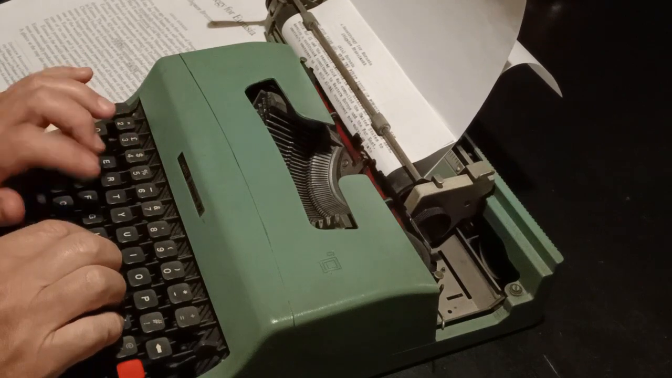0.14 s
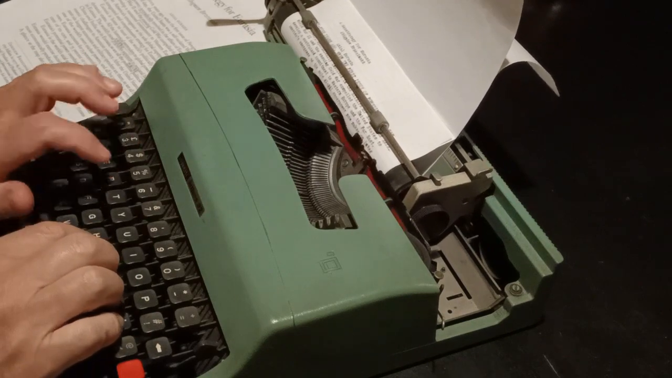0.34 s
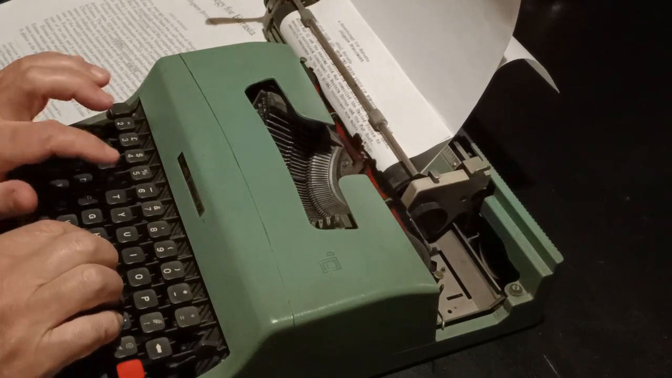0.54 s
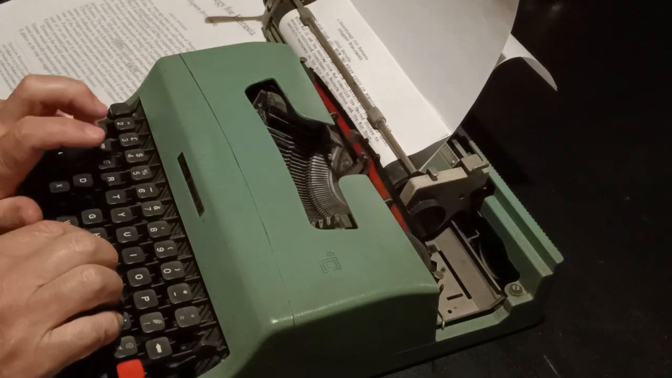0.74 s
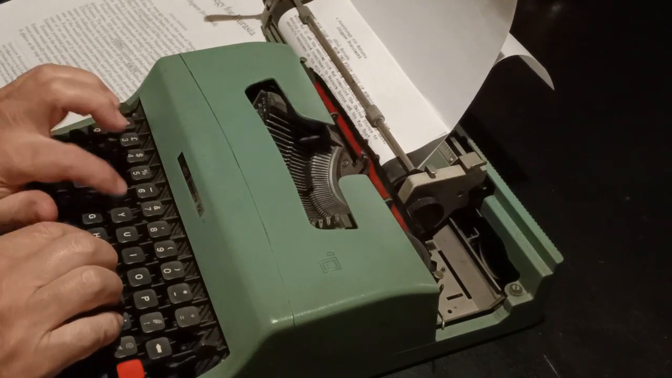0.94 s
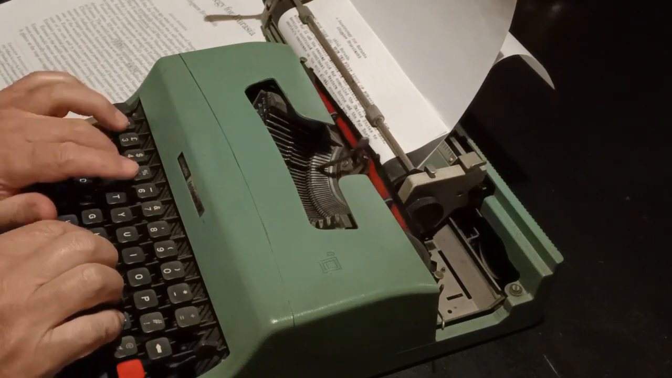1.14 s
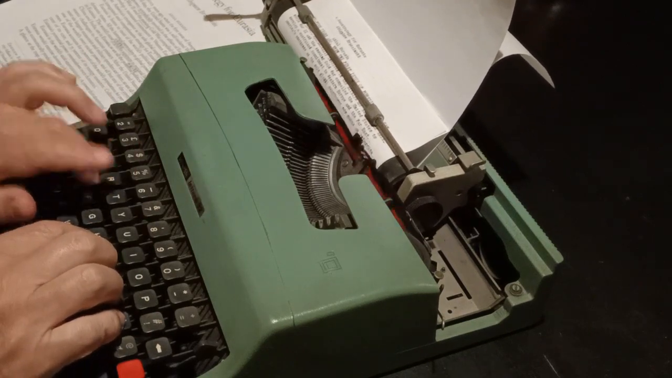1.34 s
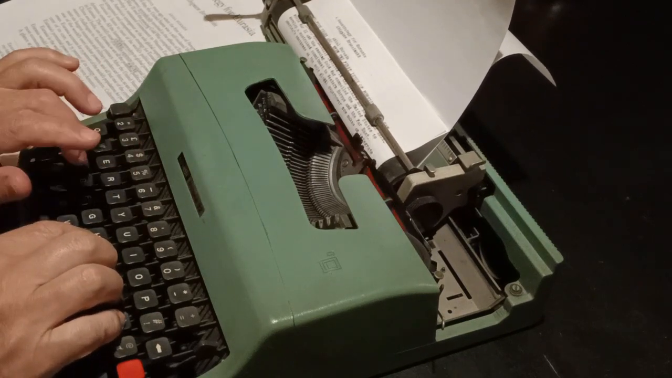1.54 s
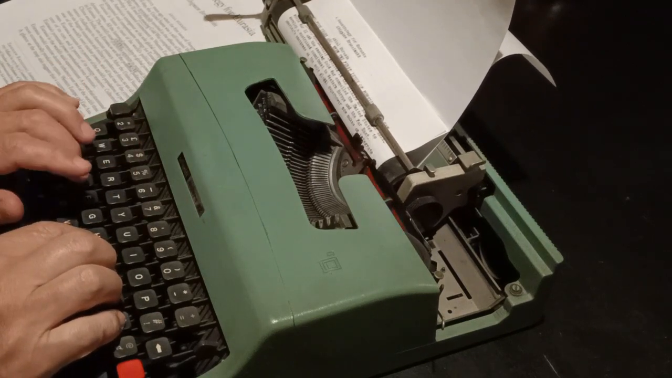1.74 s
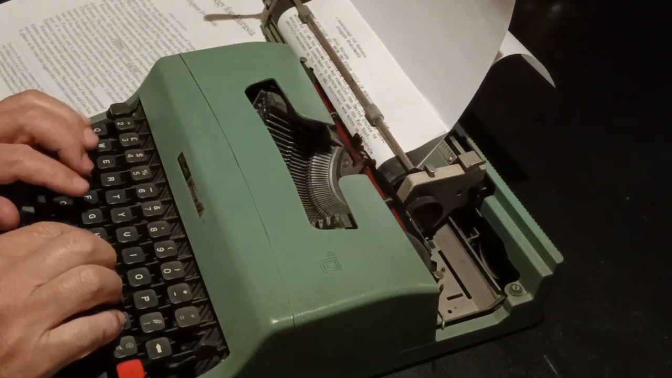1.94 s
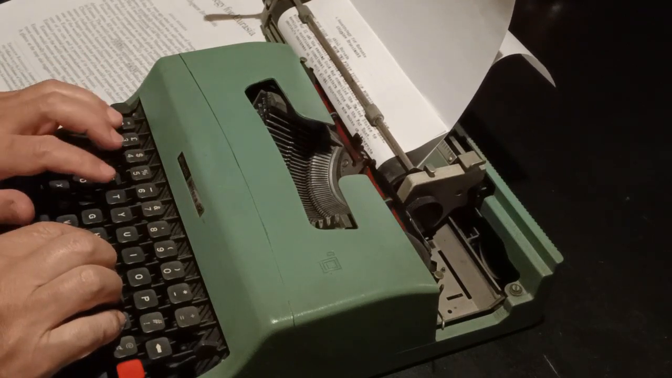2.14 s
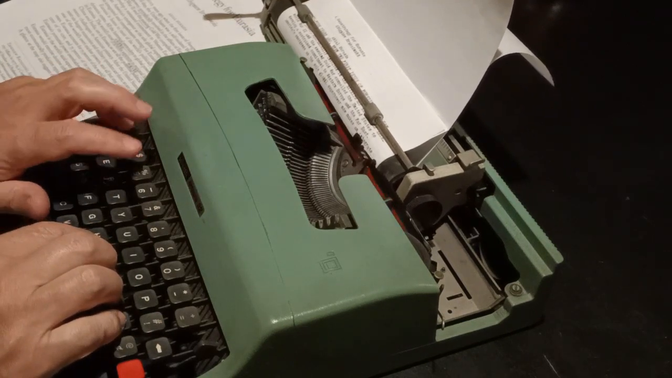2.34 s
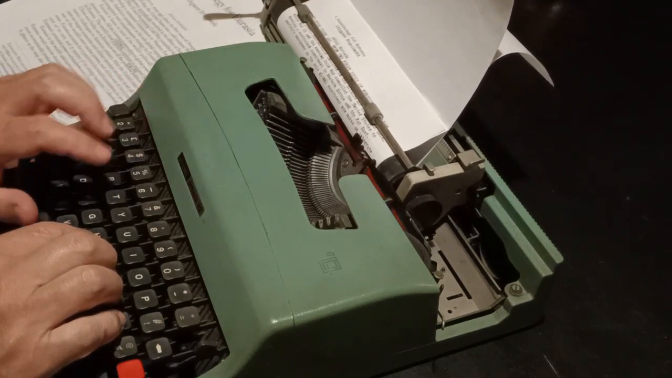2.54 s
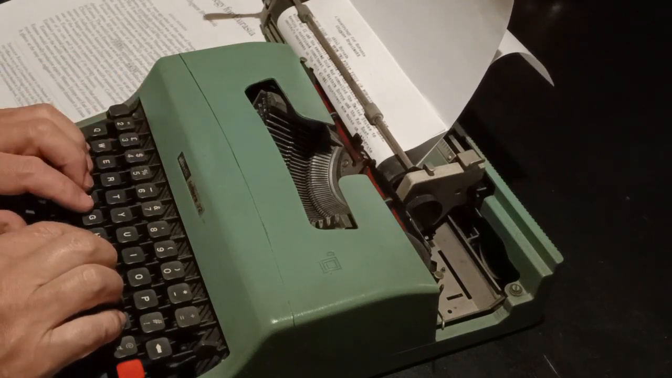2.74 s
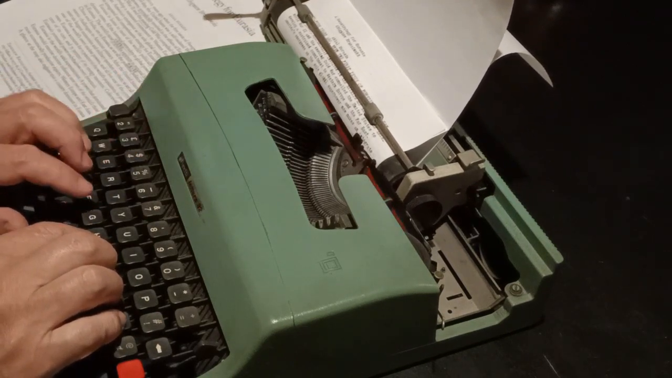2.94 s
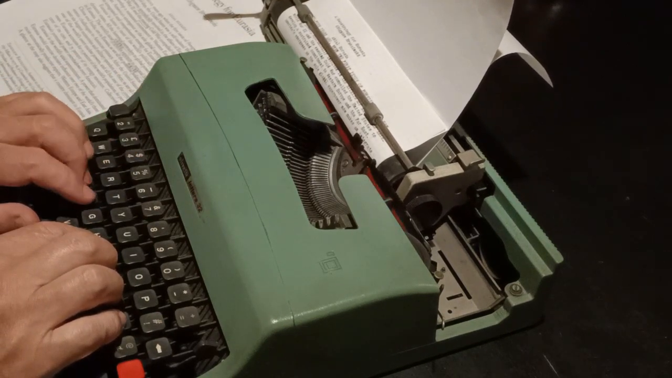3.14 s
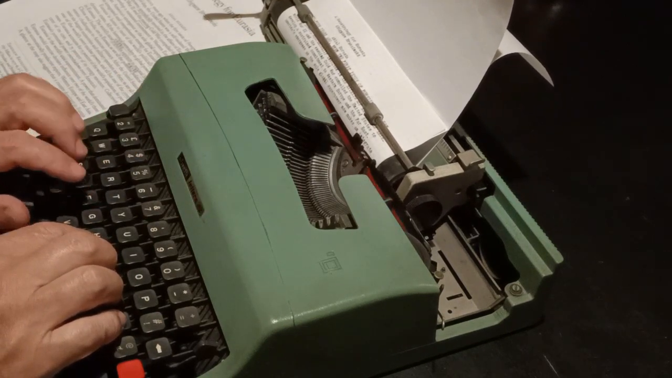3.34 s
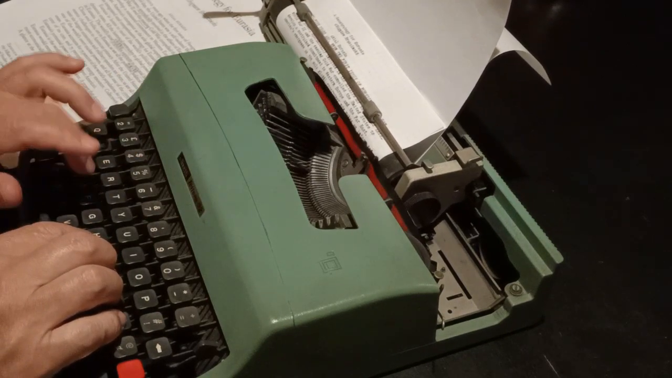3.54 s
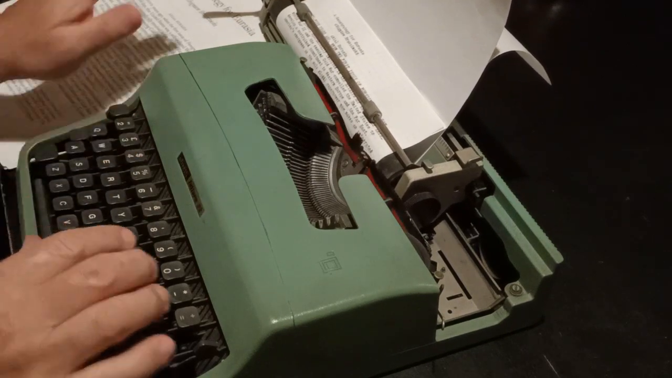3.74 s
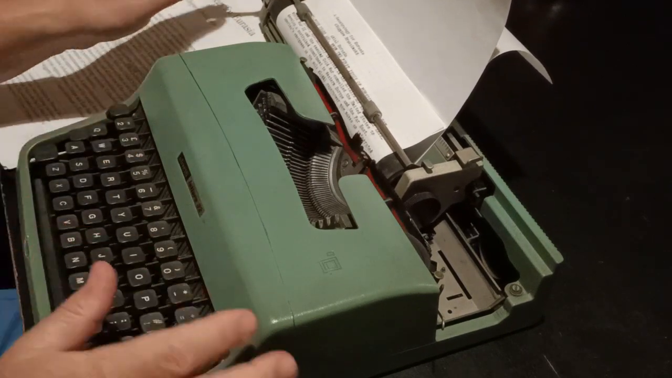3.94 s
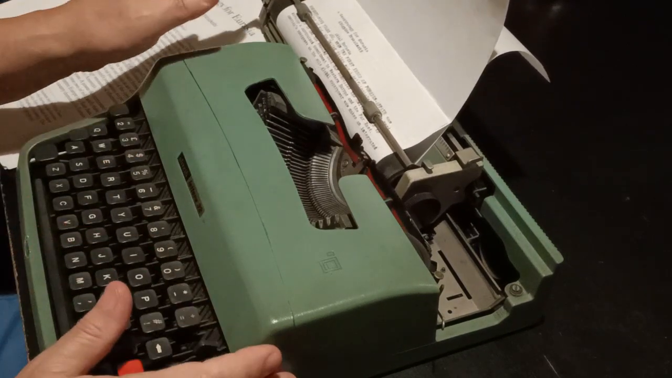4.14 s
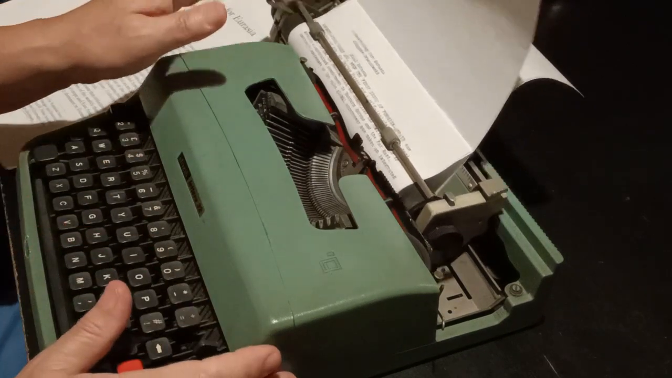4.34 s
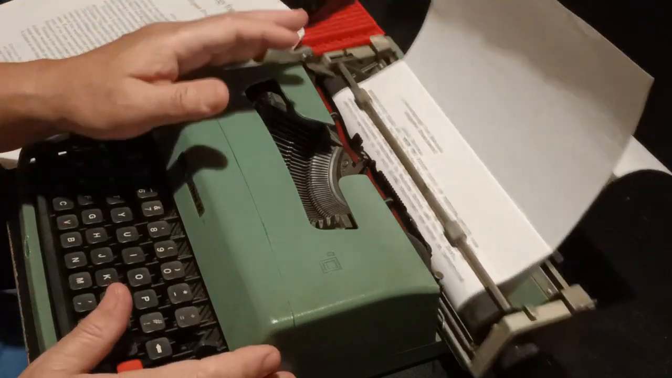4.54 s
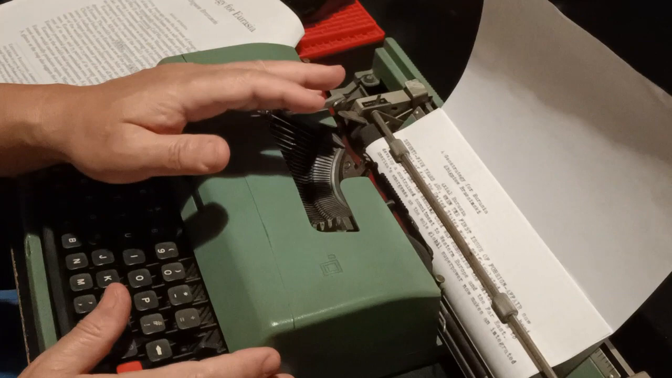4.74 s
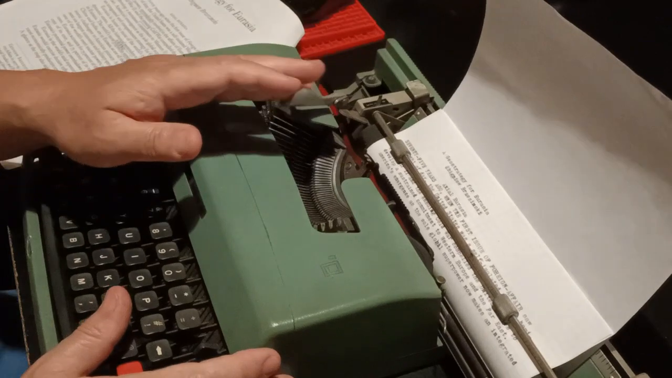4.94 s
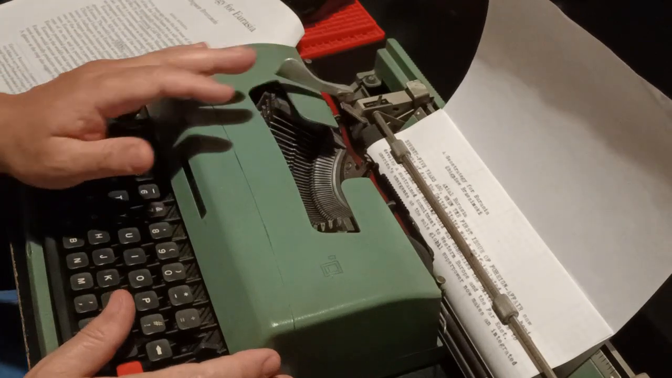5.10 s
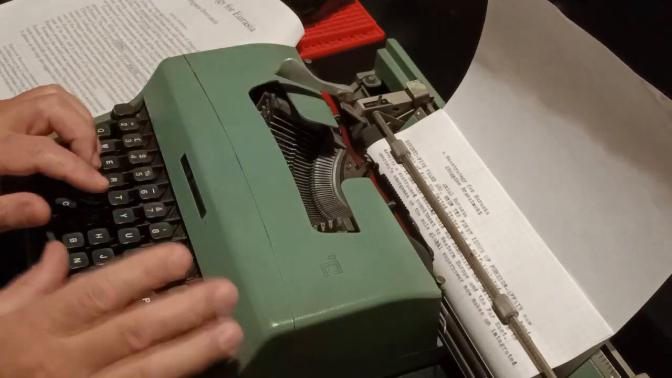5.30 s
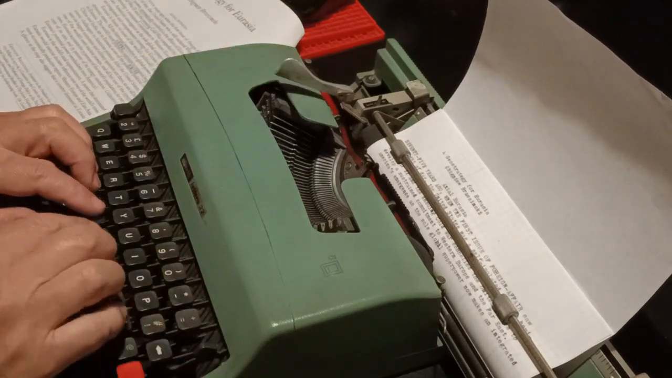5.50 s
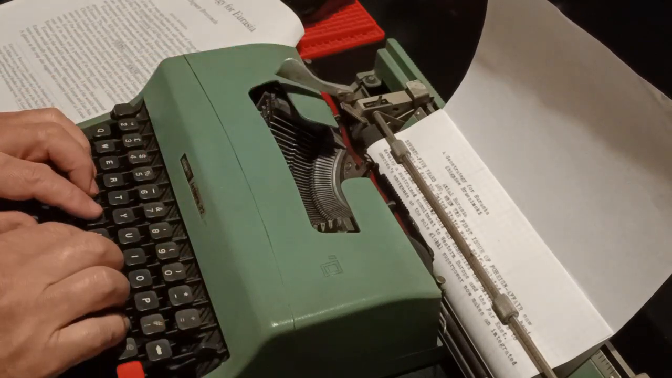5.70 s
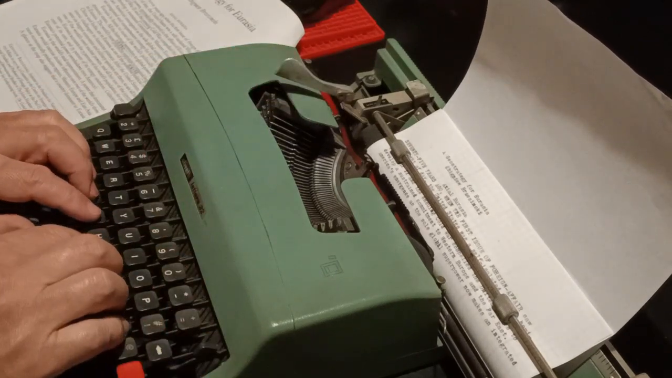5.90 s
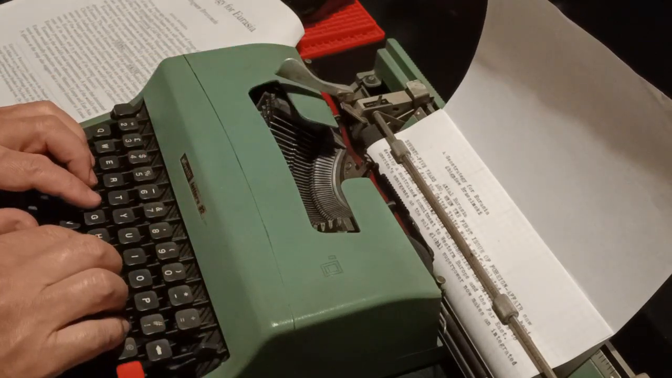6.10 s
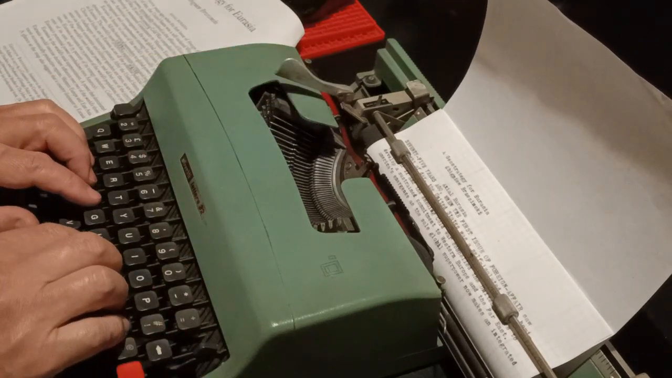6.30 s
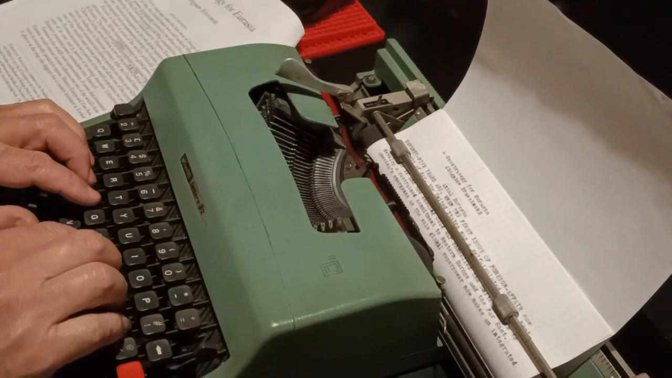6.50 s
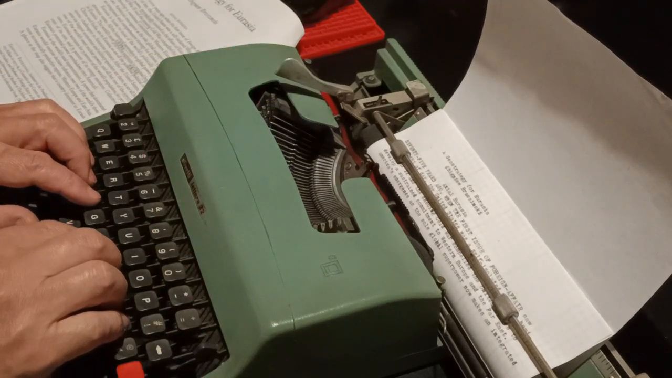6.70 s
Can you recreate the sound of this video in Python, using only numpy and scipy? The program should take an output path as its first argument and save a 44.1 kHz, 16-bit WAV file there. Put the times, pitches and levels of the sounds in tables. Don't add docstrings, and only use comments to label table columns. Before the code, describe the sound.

Close manual typewriter on a desk in a small room, stereo, arm's length. Six bright cracks come rapidly, each metal bar clacking back more softly. Tiny ticks lead into a pause, then a dull space-bar knock and one lone strike. Lever clicks precede a short grinding carriage run ending in a firm stop and settling clicks. Faint traffic remains, with a low engine drone near the end.

```python
import sys
import numpy as np
from scipy import signal
from scipy.fft import rfft, irfft, next_fast_len
from scipy.io import wavfile

SR = 44100
rng = np.random.default_rng(int(sys.argv[2]) if len(sys.argv) > 2 else 0)


def boost_factor(decibels):
    exponent = np.asarray(decibels, float) / 20
    return 10 ** exponent


def dump(signal):
    limited = np.clip(np.atleast_2d(signal).T, -1, 1)
    pcm = np.round(limited * 32767).astype(np.int16)
    wavfile.write(sys.argv[1], SR, pcm)


N = 302526

# key down [t/s], linkage [level/dB], typebar strikes [t/s], strike [level/dB], typebar ring [f/Hz]
LETTERS = [
    (.0, -23.5, 0.0082, -6, 3143),
    (.226, -30.5, 0.26, -5.5, 2990),
    (.43, -36, .4669, -8.5, 4170),
    (.68, -33.5, 0.72, -7.5, 4283),
    (.855, -32.5, .9014, -5.5, 3330),
    (1.144, -31.5, 1.1783, -6, 3610),
    (3.429, -31.5, 3.463, -6, 3593),
]
# [t/s], peak [level/dB], rattle just before [level/dB]
FALLS = [
    (0.122, -23.5, -50.5),
    (0.3689, -21.5, -50),
    (0.5676, -24, -29),
    (1.027, -24.5, -32),
    (1.3042, -22, -41),
    (3.5953, -24.5, -32),
]
# [t/s], peak [level/dB], ring [f/Hz]
TICKS = [(.856, -23.5, 6000), (1.3959, -29.5, 5500), (1.4561, -38, 5860), (1.4814, -38.5, 3350),
         (1.5055, -39, 6200), (1.5339, -41.5, 2620), (2.5248, -32.5, 3150), (2.6904, -43.5, 5830),
         (2.7016, -46, 5450), (3.0492, -60, 5770), (3.2161, -37.5, 5900), (4.2383, -37, 4300),
         (4.2654, -43, 1700), (4.371, -37, 2990), (4.4804, -26, 2560), (4.9935, -29, 2010),
         (5.0028, -23, 2160), (5.0195, -22.5, 2870), (5.9394, -58, 5790), (5.9588, -60, 2340)]
# [t/s], [level/dB], desk [level/dB], lasts [t/s]
SLIDES = [(1.393, -39.5, 2.5, .04), (1.44, -50, -7.5, .1), (2.337, -41, 4, .05), (2.534, -40.5, -2, .014),
          (3.148, -53.5, -2, .044), (4.104, -35.5, -16, .056), (4.135, -49.5, 4, .03),
          (4.296, -32, -8.5, 0.015), (4.766, -24.5, -11.5, 0.024), (4.801, -34, -7, .04),
          (4.948, -43.5, 1.5, 0.046)]
# [t/s], peak [level/dB], desk [level/dB], decay t60 [t/s]
KNOCKS = [
    (2.35, -27.5, -12, 0.14),
    (4.7707, -20, -19, 0.066),
    (4.9577, -30, -10, 0.065),
    (5.061, -25, -19, 0.046),
]
# [t/s], peak [level/dB], ring [f/Hz]
LEVER_CLICKS = [(3.9923, -48, 2990), (4.0053, -37, 3920), (4.0204, -42.5, 3910), (4.0524, -49, 2400),
                (4.0908, -45, 3460), (4.1036, -28.5, 5340), (4.116, -26, 2820), (4.151, -28.5, 3730),
                (4.5134, -33, 3660), (4.7052, -33, 1820), (5.0925, -34, 2600)]
# [t/s], roll [level/dB]
CARRIAGE_ROLL = [
    (4.2, -66),
    (4.279, -58.5),
    (4.303, -46),
    (4.34, -50),
    (4.379, -41.5),
    (4.441, -44),
    (4.495, -40.5),
    (4.74, -48.5),
    (4.77, -38.5),
]
# [t/s], rings for [t/s], [level/dB]
PLUCKS = [
    (.011, 0.26, 1.5),
    (3.15, 0.051, -25.5),
]
# [f/Hz], [level/dB], decay t60 [t/s]
BELL_PARTIALS = [(6423, -42, .68), (11188, -52, .6)]

# [f/Hz], density [level/dB]
PLATEN_COLOUR = [(180, -63), (300, -31.5), (703, -20), (1150, -17.5), (1650, -8.5), (2200, -11.5),
                 (3060, -1), (4880, -4), (5670, -0.5), (6880, -12.5), (8000, -13), (10400, -36.5),
                 (17600, -120)]
# [f/Hz], density [level/dB]
FRAME_COLOUR = [(150, -57), (250, -5), (398, -8), (466, -19.5), (614, -11.5), (1180, -11.5), (1310, -9.5),
                (1490, -12), (1700, -8), (3710, -3), (4820, -6), (5730, -5), (8000, -18), (10400, -46),
                (17600, -120)]
# [f/Hz], density [level/dB]
EDGE_COLOUR = [(4120, -38), (7000, -24), (8250, -2.5), (8960, -5), (10200, -5), (11800, -4.5), (14100, 1),
               (15500, -7), (16500, -32)]
# [f/Hz], width [f/Hz], [level/dB]
DESK_MODES = [(64, 26, -8), (87.5, 29, -3.5), (120.4, 17, 3), (195, 31, -6.5)]
# [f/Hz], width [f/Hz], [level/dB]
ROD_MODES = [(1680, 90, 3), (2560, 40, -4.5), (2990, 110, -8), (3580, 150, -14.5), (4000, 58, 7.5),
             (5500, 600, 10.5), (6100, 210, -3)]
# [f/Hz], width [f/Hz], [level/dB]
REST_MODES = [(1003.5, 27, 8), (804, 400, -15.5)]
# [f/Hz], width [f/Hz], [level/dB]
RAIL_MODES = [(1328, 23, -8), (1696, 39, -7), (2560, 61, 1), (3150, 60, -2.5), (3640, 56, -1.5),
              (4020, 33, 4.5), (4420, 48, -3), (5630, 67, 0), (6230, 46, -24)]
# [f/Hz], width [f/Hz], [level/dB]
CASE_MODES = [(260.2, 80, -3), (401, 40.7, 0), (650, 77, -2), (847, 60, -4)]

# [f/Hz], correlation [-1..1]
CONTACT_ALIKE = [(60, 0.97), (180, 0.99), (550, 0.75), (1650, 0.848), (4970, 0), (15000, 0.28)]
# [f/Hz], correlation [-1..1]
QUIET_ALIKE = [(60, 0.78), (240, 0.79), (950, 0.33), (3770, -0.43), (15000, 0.02)]
# [f/Hz], correlation [-1..1]
ROOM_ALIKE = [(150, 0.99), (500, .8), (2000, 0.37), (8000, 0.27)]
# [f/Hz], difference [level/dB]
LEAN = [(60, -2.5), (150, 0), (380, 0.0), (950, -0.5), (2380, 0), (5980, -1), (15000, -3)]
# [f/Hz], t60 [t/s]
ROOM_DECAY = [(100, 0.53), (500, 0.85), (2000, 0.42), (5000, 0.43), (13000, 0.36)]
# [f/Hz], density [level/dB]
AIR_COLOUR = [(13, -33.5), (22, -4), (49, 0), (101, -9.5), (171, -9), (281, -17), (332, -16.5),
              (610, -24.5), (663, -32), (762, -26.5), (1030, -27.5), (2650, -31), (5910, -39),
              (15200, -39.5), (16500, -49)]
# [t/s], [level/dB]
STREET = [(0, -77), (1.7, -79.5), (2.4, -76), (3.9, -75), (5.3, -74), (6.1, -70.5), (6.86, -71)]
# [f/Hz], width [f/Hz], [level/dB]
TRAFFIC_MODES = [(424.3, 300, 2), (960, 407, -5)]
# [f/Hz], width [f/Hz], [level/dB]
TYRE_MODES = [(2630, 700, 0)]
# [f/Hz], [level/dB]
MIC = [(20, -13.5), (40, -0.5), (15000, 0), (15400, -11.5), (16400, -26)]


def along(points, hz):
    f, v = np.transpose(points)
    return np.interp(np.log(hz + 1), np.log(f + 1), v)


def curves(rows):
    s, *cols = np.transpose(rows)
    t = np.arange(N) / SR
    return [(t > s[0]) & (t < s[-1])] + [np.interp(t, s, c) for c in cols]


def filtered(x, response):
    m = next_fast_len(x.shape[-1] + SR // 4)
    gain = response(np.fft.rfftfreq(m, 1 / SR))
    power = np.sum(np.mean(abs(gain) ** 2, -1))
    return irfft(rfft(x, m) * gain / np.sqrt(power), m)[..., :x.shape[-1]]


def equalized(x, gain_db):
    m = next_fast_len(N)
    return irfft(rfft(x, m) * boost_factor(gain_db(np.fft.rfftfreq(m, 1 / SR))), m)[:, :N]


def causal(spectrum):
    def response(hz):
        cepstrum = irfft(np.log(boost_factor(along(spectrum, hz)) + 1e-6))
        half = len(cepstrum) // 2
        cepstrum[1:half] *= 2
        cepstrum[half + 1:] = 0
        return np.exp(np.fft.rfft(cepstrum, 2 * len(hz) - 2))[:len(hz)]
    return response


def modes(rows):
    def response(f):
        total = 0
        for k, (centre, width, db) in enumerate(rows):
            damping = 1j * f * width
            total = total + (-1) ** k * boost_factor(db) * damping / (centre ** 2 - f ** 2 + damping)
        return total
    return response


def spread(pair, alike):
    def mid_side(hz):
        turn = np.arccos(np.clip(along(alike, hz), -1, 1)) / 2
        return np.array([np.cos(turn), np.sin(turn)])
    mid, side = filtered(pair, mid_side)
    return np.array([mid + side, mid - side])


def grit(n, depth_db):
    jumps = np.repeat(boost_factor(depth_db * rng.standard_normal(n // 44 + 1)), 44)[:n]
    return rng.standard_normal((2, n)) * jumps / np.sqrt(np.mean(jumps ** 2))


def burst(shape, depth_db):
    rows = shape * grit(len(shape), depth_db)
    return rows * np.linalg.norm(shape) / np.linalg.norm(rows, axis=1, keepdims=True)


def add(track, s, sound):
    k = round(max(s, 0) * SR)
    track[..., k:k + sound.shape[-1]] += sound[..., :max(track.shape[-1] - k, 0)]


def blow(rise, t60, hold=0):
    t = np.arange(SR // 5) / SR
    return (1 - np.exp(-t / rise)) ** 2 * boost_factor(-60 * np.maximum(t - hold, 0) / t60)


def shove():
    return blow(0.0021, 0.011) * [[1], [.15]]


def contact(forces, body, s, shape, db, desk_db, top_db, depth_db, push):
    add(forces[body], s, boost_factor(db) * burst(shape, depth_db))
    add(forces["top"], s, boost_factor(db + top_db) * burst(shape, depth_db))
    add(forces["desk"], s, boost_factor(db + desk_db) * push)


def ping(forces, s, db, hz, t60):
    wave = blow(0.00028, t60) * np.sin(2 * np.pi * hz * np.arange(SR // 5) / SR)
    add(forces["ring"], s, boost_factor(db) * wave * [[1], [.3]])


def quiet():
    noise = rng.standard_normal((3, 2, N))
    _, traffic_db = curves(STREET)
    air = boost_factor(-65) * filtered(noise[0], lambda hz: boost_factor(along(AIR_COLOUR, hz)))
    engines = boost_factor(traffic_db - 2) * filtered(noise[1], modes(TRAFFIC_MODES))
    tyres = boost_factor(traffic_db - 2) * filtered(noise[2], modes(TYRE_MODES))
    return spread(air + engines + tyres, QUIET_ALIKE)


def slide(forces, s, db, desk_db, top_db, travel):
    shape = blow(0.0012, .05, travel)
    contact(forces, "frame", s, shape, db - 8.0, desk_db, top_db, 4.1, burst(shape, 0))


def room(x):
    out, step = np.zeros((2, N)), 12000
    for k in range(0, N, step):
        hz, t, z = signal.stft(rng.standard_normal((2, SR // 2)), SR, nperseg=256)
        decay = boost_factor(-60 * t / along(ROOM_DECAY, hz)[:, None])
        tail = signal.istft(z * decay, SR, nperseg=256)[1]
        tail = tail / np.linalg.norm(tail[0])
        add(out, k / SR + .006, signal.fftconvolve(x[:, k:k + step], tail, axes=1))
    return out


def letter(forces, down, link_db, s, db, hz):
    slide(forces, down, link_db, desk_db=-3, top_db=-5.5, travel=s - down)
    shape = blow(0.00037, 0.0068) + 0.49 * blow(0.00095, 0.033)
    contact(forces, "platen", s - .0008, shape, db, -38.5, -15.5, 3.8, shove())
    ping(forces, s - .0004, db + 2.0, hz, .009)
    ping(forces, s, db - 21.5, 1710, 0.032)
    add(forces["kick"], s, boost_factor(db + 10.5) * np.ones((2, 1)))
    slide(forces, s + .0145, db - 25, desk_db=-8, top_db=-11.5, travel=0.04)


def bell():
    out = np.zeros(N)
    for s, length, pluck_db in PLUCKS:
        t = np.arange(round(length * SR)) / SR
        tone = sum(boost_factor(db - 60 * t / t60) * np.sin(2 * np.pi * hz * t) for hz, db, t60 in BELL_PARTIALS)
        ends = np.clip(np.minimum(t, length - t) / .004, 0, 1)
        add(out, s, boost_factor(pluck_db) * tone * ends)
    return out


def fall(forces, s, db, lead_db):
    lead = .017
    slide(forces, s - lead, lead_db, desk_db=-6.5, top_db=-17, travel=lead)
    knock(forces, s, db, desk_db=-31.5, top_db=-8.5, rest_db=-22, t60=.066)


def knock(forces, s, db, desk_db, top_db, rest_db, t60):
    shape = blow(.0006, .01) + 0.44 * blow(0.0017, t60)
    contact(forces, "frame", s - .001, shape, db + 1.0, desk_db - 0.5, top_db, 3.015, shove())
    add(forces["rest"], s, boost_factor(db + rest_db + 10.0) * burst(blow(0.00027, 0.027), 0))


def tick(forces, s, db, hz, desk_db, top_db, t60=0.03):
    contact(forces, "frame", s - .0006, blow(0.00033, t60), db - 5.0, desk_db - 15, top_db, 2.2, shove())
    ping(forces, s - .0004, db - 1.5, hz, 0.68 * t60)


def roll(forces):
    moving, roll_db = curves(CARRIAGE_ROLL)
    rollers = moving * boost_factor(roll_db - 2.5) * grit(N, 4.7)
    forces["rollers"] += rollers
    forces["frame"] += 0.97 * rollers[::-1]
    forces["top"] += moving * boost_factor(roll_db - 16) * grit(N, 3.0)
    forces["desk"] += moving * boost_factor(roll_db - 11.5) * grit(N, 0)


def contact_forces():
    bodies = ["platen", "kick", "frame", "top", "desk", "rest", "ring", "rollers"]
    forces = {body: np.zeros((2, N)) for body in bodies}
    for row in LETTERS:
        letter(forces, *row)
    for row in FALLS:
        fall(forces, *row)
    for s, db, hz in TICKS:
        tick(forces, s, db, hz, desk_db=-17, top_db=-9.5)
    for s, db, desk_db, travel in SLIDES:
        slide(forces, s, db, desk_db, -9, travel)
    for s, db, desk_db, t60 in KNOCKS:
        knock(forces, s, db, desk_db, -15, -24.5, t60)
    for s, db, hz in LEVER_CLICKS:
        tick(forces, s, db, hz, desk_db=-30, top_db=-21)
    roll(forces)
    return forces


def typewriter():
    forces = contact_forces()
    frame, desk = forces["frame"], forces["desk"]
    clatter = filtered(frame, causal(FRAME_COLOUR))
    clatter += filtered(forces["top"], causal(EDGE_COLOUR))
    clatter += filtered(desk, modes(DESK_MODES))
    clatter += boost_factor(-17.0) * filtered(frame, modes(ROD_MODES))
    clatter += boost_factor(0.5) * filtered(forces["rollers"], modes(RAIL_MODES))
    clatter += boost_factor(-18) * filtered(frame, modes(CASE_MODES))
    clatter += boost_factor(-7.5) * filtered(desk, modes(CASE_MODES))
    cracks, kick = filtered(np.array([forces["platen"], forces["kick"]]), causal(PLATEN_COLOUR))
    rings = forces["ring"] + filtered(forces["rest"], modes(REST_MODES))
    return [spread(x, CONTACT_ALIKE) for x in (clatter, cracks, kick, rings)]


def drone():
    t = np.arange(N) / SR - 6.38
    db = -50.5 - np.where(t < 0, 39.5, 55.5) * t ** 2
    phase = 2 * np.pi * 42.4 * t
    note = np.sin(phase) + boost_factor(-22.0) * np.sin(2 * phase + 0.78)
    return boost_factor(db + 4.5) * note * boost_factor([[-.6], [.6]])


def scene():
    clatter, cracks, kick, rings = typewriter()
    rings = rings + bell()
    wet = spread(room(clatter + kick + boost_factor(-5.0) * rings), ROOM_ALIKE)
    machine = clatter + cracks + rings + boost_factor(-9.0) * wet

    def lean_db(hz):
        half = along(LEAN, hz) / 2
        return np.array([half, -half])
    return equalized(machine, lean_db) + quiet() + drone()


def band_limit(x):
    return signal.sosfilt(signal.butter(12, 16620, fs=SR, output="sos"), x)


def record(dry):
    heard = equalized(dry, lambda hz: along(MIC, hz))
    return band_limit(heard)


dry = scene()
out = record(dry)
dump(out)
```